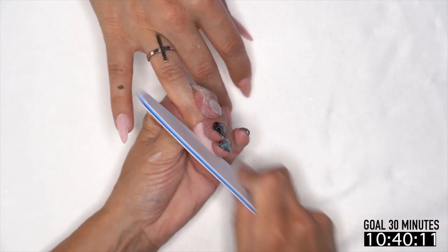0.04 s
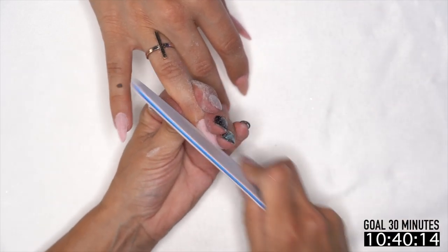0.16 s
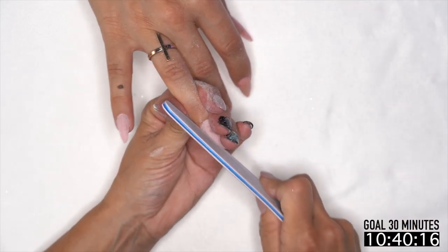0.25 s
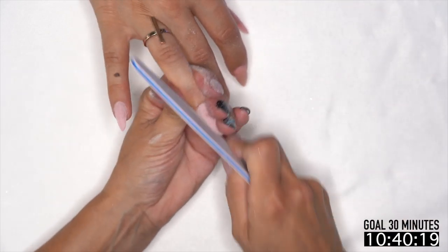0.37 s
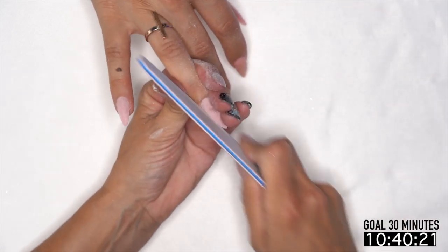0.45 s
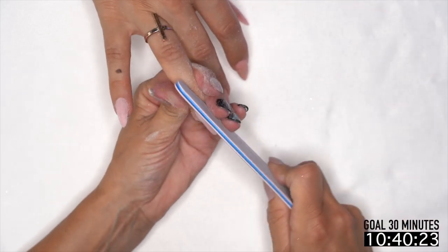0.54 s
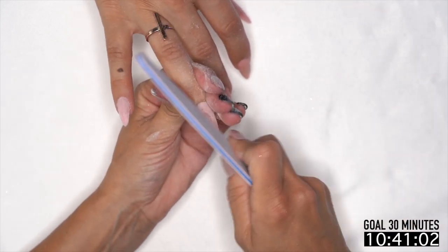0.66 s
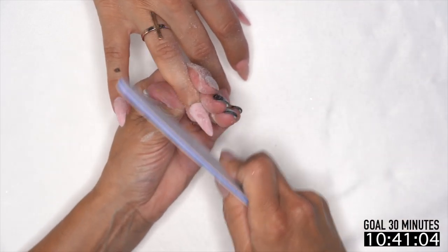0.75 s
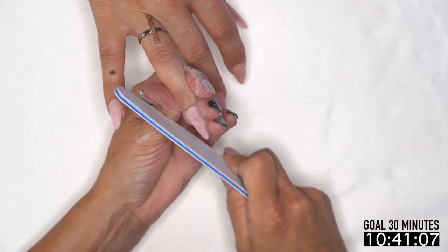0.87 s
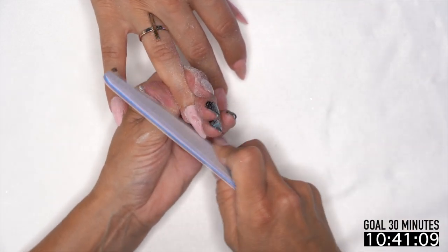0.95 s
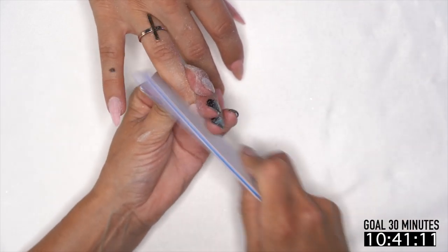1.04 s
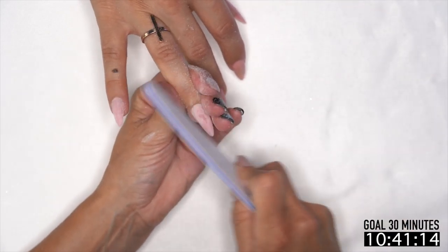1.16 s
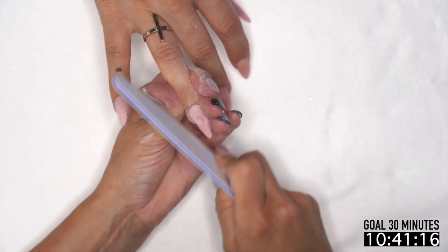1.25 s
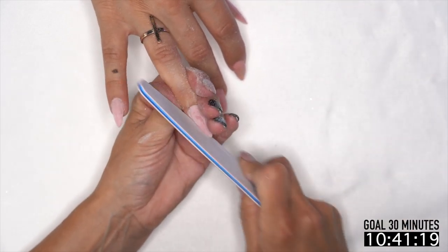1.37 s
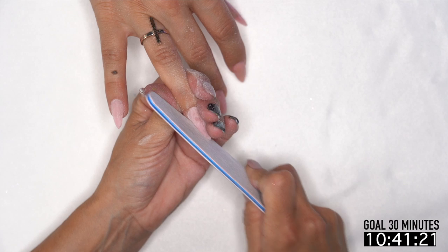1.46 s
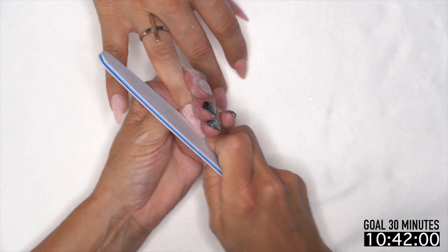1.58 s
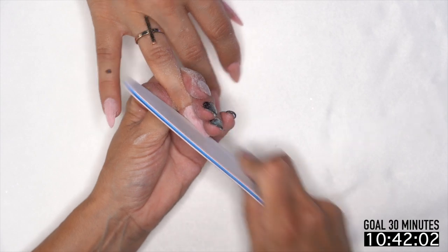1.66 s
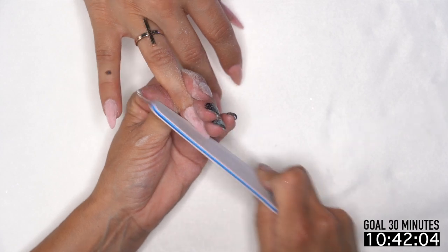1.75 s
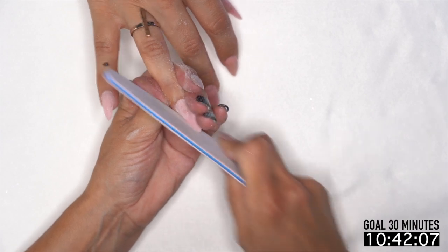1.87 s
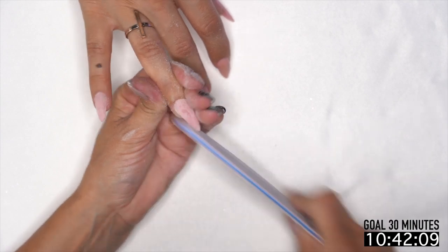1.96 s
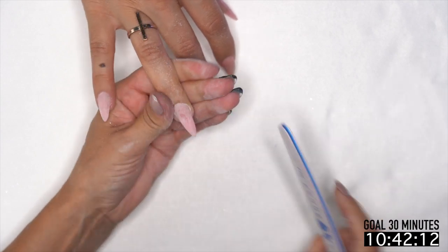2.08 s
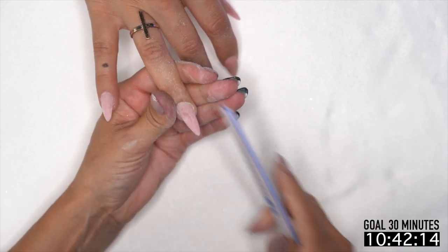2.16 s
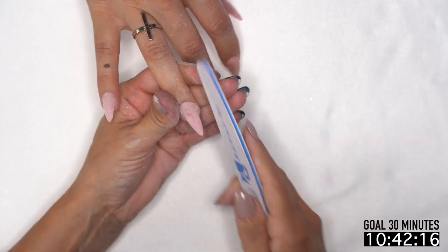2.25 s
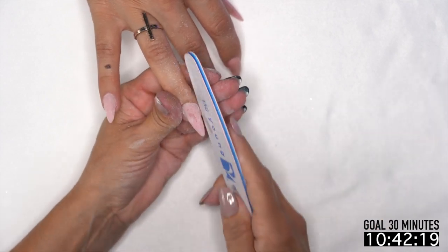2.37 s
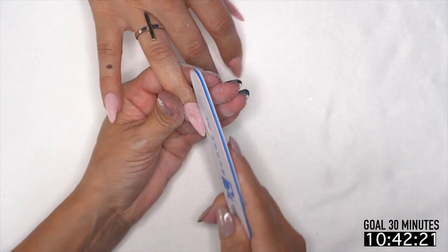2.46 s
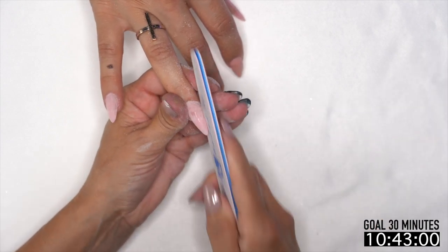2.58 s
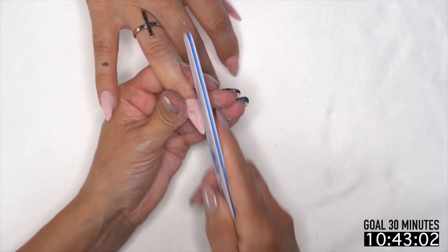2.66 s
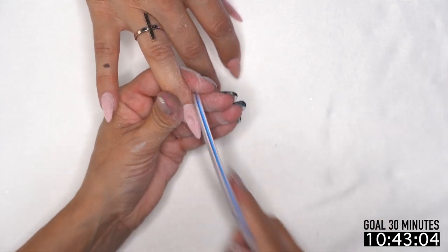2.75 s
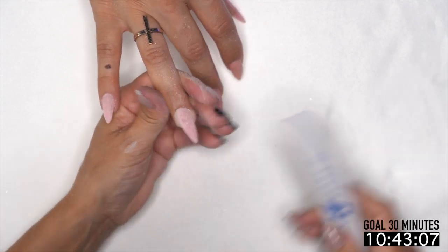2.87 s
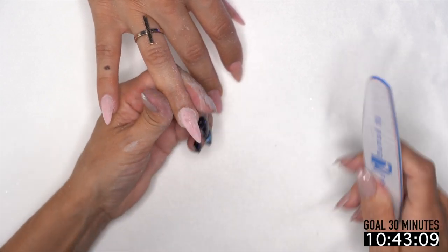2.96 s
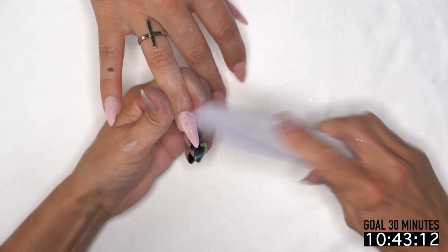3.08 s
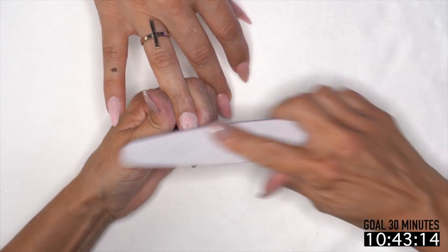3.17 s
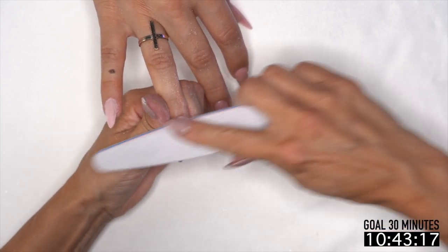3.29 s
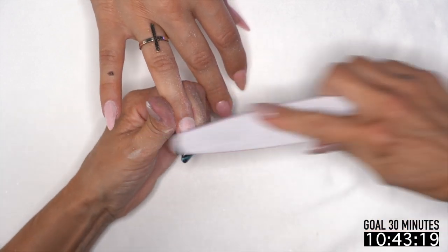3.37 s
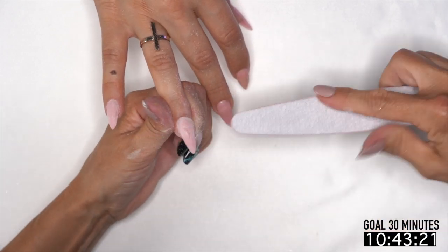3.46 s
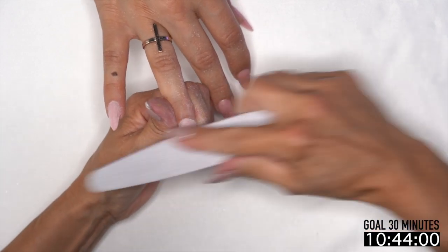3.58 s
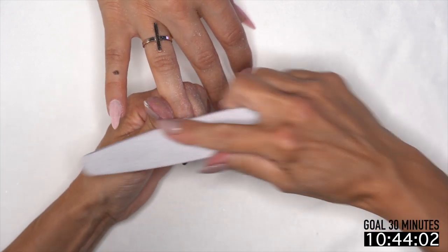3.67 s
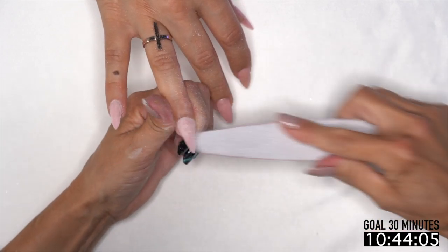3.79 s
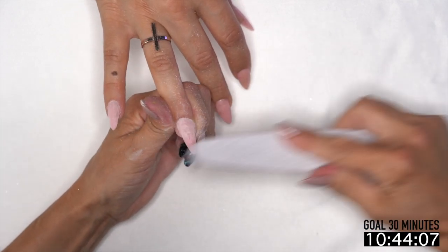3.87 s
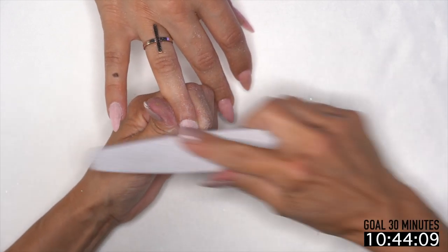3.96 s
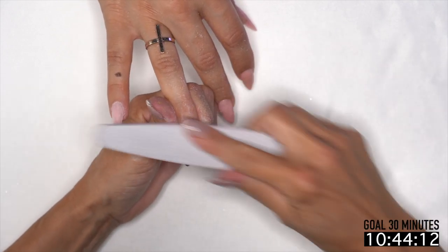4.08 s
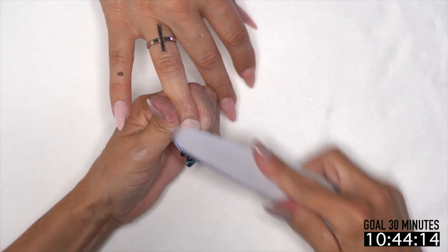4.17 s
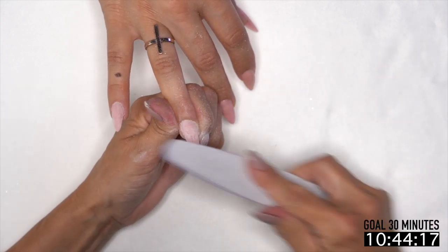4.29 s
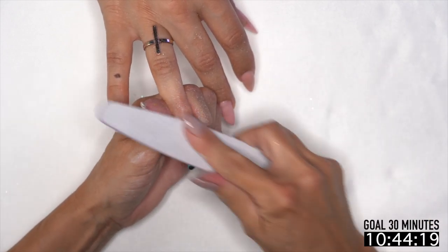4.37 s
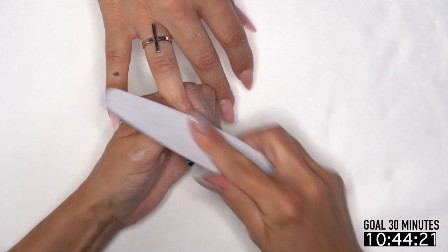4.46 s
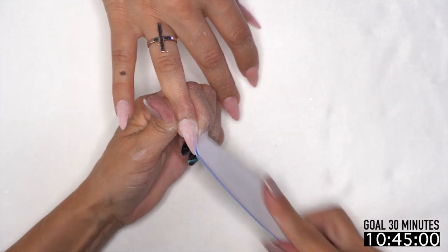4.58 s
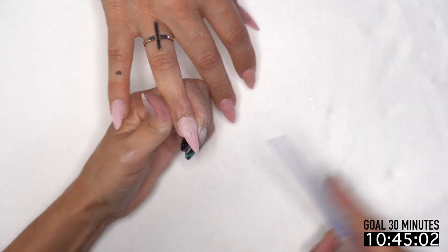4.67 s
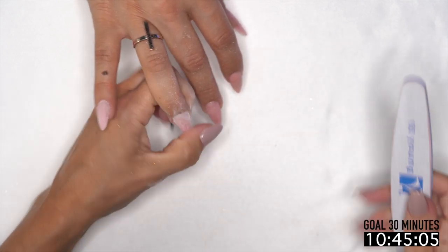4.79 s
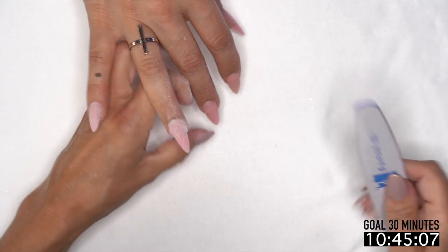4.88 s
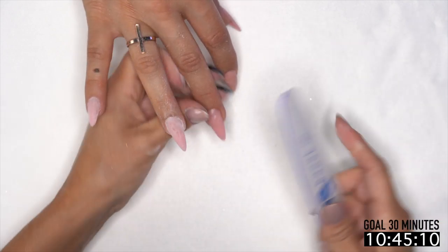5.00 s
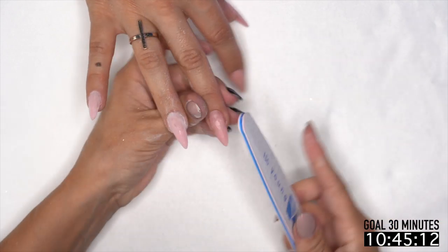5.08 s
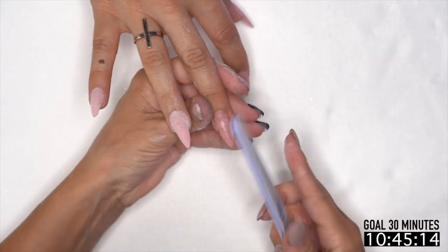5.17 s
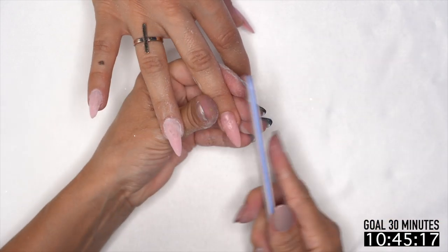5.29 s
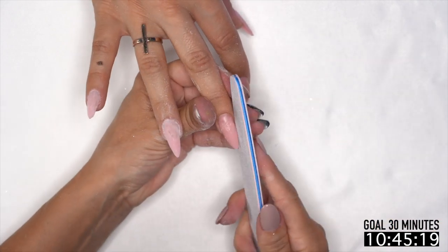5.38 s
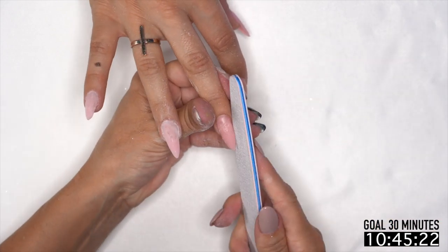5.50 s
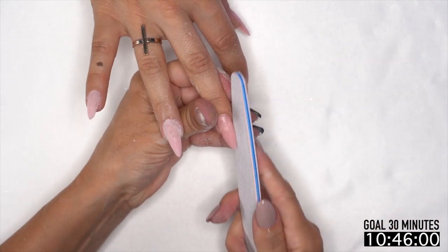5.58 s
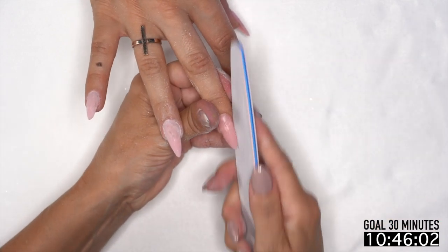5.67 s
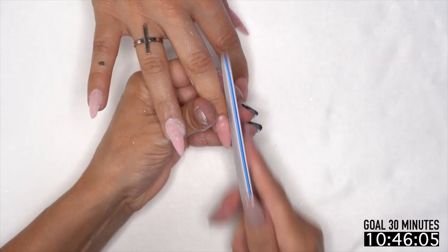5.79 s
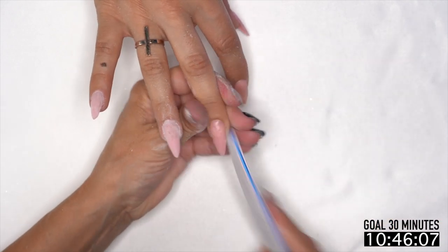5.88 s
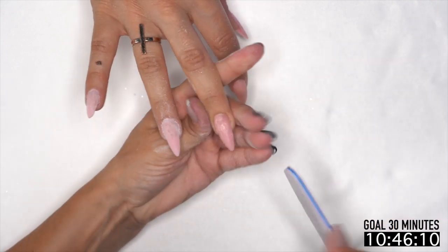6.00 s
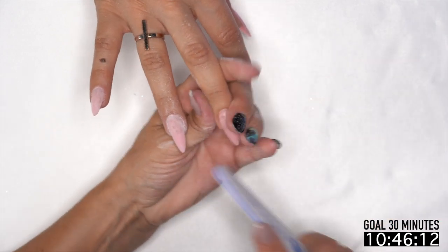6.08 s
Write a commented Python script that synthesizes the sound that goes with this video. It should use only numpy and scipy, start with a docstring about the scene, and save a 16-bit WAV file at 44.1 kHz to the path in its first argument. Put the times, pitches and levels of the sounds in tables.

```python
"""In a small salon, close by, an emery board files a gel nail in quick back-and-forth strokes.
Friction is the source: grit catches on the gel, and its impacts excite the modes of board and nail.
Each of three grips has its own resonances; pushes are full and pulls mostly lighter.
The board's bending note glides, it squeaks, snags and taps, and fingers slide and bump.
Mains hum and ventilation lie under it all."""
import sys
import numpy as np
from scipy import signal
from scipy.fft import rfft, irfft
from scipy.io import wavfile
from scipy.ndimage import uniform_filter1d, map_coordinates

SR = 44100
rng = np.random.default_rng(int(sys.argv[2]) if len(sys.argv) > 2 else 0)


def store_pcm(level_fs):
    """Save levels as 16-bit WAV."""
    pcm = np.round(np.clip(level_fs, -1, 1) * 32767).astype(np.int16)
    wavfile.write(sys.argv[1], SR, np.atleast_2d(pcm).T)


N = 270641
TIME = np.arange(N) / SR
FFT_SIZE = 4096
FREQ = np.maximum(np.arange(FFT_SIZE // 2 + 1) * SR / FFT_SIZE, 1)

# Hum of mains and fans. Each row: frequency in Hz, level before the swell in dB, waver in dB.
HUM_LINES = [(31.4, -62.5, 2), (60.2, -51, 2.5), (86.2, -44, 1.5), (118.8, -41.5, 0.55), (144.7, -52, 5),
             (256.6, -60.5, 3.5), (383.3, -59.5, 2)]
# Ventilation noise. Each row: frequency in Hz, relative spectral density in dB.
AIR_SPECTRUM = [(20, -7), (32, -4), (60, -4.5), (120, -11.5), (177, -12.5), (310, -14.5), (375, -18.5),
                (420, -28), (620, -22.5), (700, -31), (900, -38), (1600, -42), (8900, -51), (16000, -56)]
# Rumble and hum grow louder, then hold. Each row: time in seconds, gain in dB.
AIR_SWELL = [(0, -4.5), (3.8, 1.5), (6.14, 1.5)]
# Fingers slide as the grip changes. Each row: start in seconds, end in seconds, level in dB.
FINGER_SLIDES = [(0.973, 1.064, -52), (2.924, 3.038, -53), (3.034, 3.077, -44.5), (3.113, 3.154, -45.5),
                 (4.721, 5.002, -48), (4.899, 4.935, -42.5), (4.993, 5.185, -45.5), (5.022, 5.047, -38),
                 (5.078, 5.112, -38.5), (5.207, 5.242, -42.5), (5.269, 5.33, -48)]
# Fingers and board bump the hand. Each row: time in seconds, level in dB, ratio to the hand's pitch.
HAND_BUMPS = [(0.07, -41, 1.5), (1.712, -37, 1.13), (2.02, -35, 1.04), (3.08, -33, 1.06), (3.107, -31, 1),
              (3.211, -35.5, 0.89), (3.405, -27, 1), (3.44, -29.5, 0.85), (3.82, -28.5, 0.85),
              (3.885, -30, 0.84), (4.695, -36.5, 1.33), (4.871, -42, 1), (5.768, -32, 2.17)]
# Five sets of resonances. Each row: centre in Hz, width in Hz, relative gain in dB.
SKIN_MODES = [(1480, 1500, -3.5), (2810, 1270, 1), (5100, 2400, 0), (6800, 930, -2), (12200, 18000, -9)]  # sliding skin
HAND_MODES = [(215, 230, 0.5), (291, 160, -0.5), (1060, 630, -9), (1950, 480, -17.5)]  # the bumped hand
EDGE_MODES = [(158, 200, -3.5), (910, 750, -2), (2055, 940, 0.5), (3180, 1350, -1), (4370.0, 350, -0.5),
              (5170, 1260, 1.5), (6670, 2130, -2.2), (8200, 700, -10.5), (9700, 1800, -10.5),
              (11300, 6000, -8.5), (13900, 2060.0, -18), (15410.0, 1720.0, -18)]  # board and nail, the board on edge along the nail's side
TIP_MODES = [(188, 88, -14), (900, 1900, 2), (1700, 850, -19), (3170, 1040, 1), (3770, 250, -4.5),
             (4990, 1400, 4.5), (6870, 1650, 3.5), (8200, 490, -6), (9760, 3000, -4.5), (12100, 3800, -1.5),
             (14600, 2200, -4.5), (15600, 960, -11)]  # the board pointing along the finger
FACE_MODES = [(210, 175, 1), (934, 1300, -2.5), (1580, 510, -10.5), (3000, 1600, -1.5), (4360, 520, -1),
              (5020, 1330, 1), (6630, 2040, -2), (8300, 400, -11), (10100, 2500, -3.5), (11800, 1800, -3.5),
              (13200, 3600, -6), (15000, 1600, -7.5)]  # the board flat across the nail
# Snags and taps. Each row: time in seconds, level in dB, decay in seconds, centre in Hz, width in Hz.
RIM_TAPS = [(0.622, -14.5, 0.0043, 6550, 4220), (1.066, -30, 0.0027, 3000, 6000),
            (1.1359, -16.5, 0.0049, 6100, 5100), (1.229, -40.5, .005, 12000, 5000),
            (1.3595, -20.5, 0.0015, 5530, 1280), (1.401, -39, 0.0028, 3000, 6000),
            (1.612, -21, 0.0092, 2720, 2440), (2.618, -34, .005, 5000, 5000),
            (3.280, -21, 0.0036, 3450, 4000), (3.384, -21, 0.0091, 4600, 2500),
            (3.496, -21.5, .004, 6100, 8000), (4.136, -36, .004, 3500, 6000),
            (5.238, -39.5, 0.012, 1900, 1400), (5.983, -21.5, 0.0038, 11700, 6000)]
# Squeaks of the board. Each row: start in seconds, length in seconds, middle pitch in Hz, level in dB.
BOARD_SQUEAKS = [(1.844, 0.046, 1800, -32), (3.208, 0.03, 3620, -35.5), (3.266, 0.027, 2450, -30),
                 (3.37, 0.096, 4770, -28), (3.406, 0.042, 2600, -25), (5.745, 0.067, 2550, -37),
                 (5.75, 0.056, 900, -36)]
# How the hand moves. Each row: grip, direction, shares of the stroke spent speeding up and slowing
# down, body gain in dB, bending note in dB relative to the rasp, its glide in octaves per second.
HAND_MOTIONS = [("edge", "push", 0.6, 0.32, -0.8, -17, 0.59),
                ("edge", "pull", 0.54, 0.47, -7.5, -27.5, 0.93),
                ("tip", "push", 0.96, 0.38, -1.2, -20, 3.7), ("tip", "pull", 0.39, 0.55, -8, -25, 5.1),
                ("face", "push", 0.13, 0.78, -0.99, -14.5, 4.6),
                ("face", "pull", 0.44, 0.54, -1.2, -10.5, 5.3)]
# Passes of the board. Each row: start in seconds, end in seconds, rasp level in dB,
# fizz gain in dB relative to the rasp, grip, direction.
BOARD_STROKES = [(-0.05, 0.069, -30, 7, "edge", "pull"), (0.082, 0.199, -28, 6.5, "edge", "push"),
                 (0.213, 0.335, -30.5, 8.5, "edge", "pull"), (0.38, 0.499, -31.5, 8, "edge", "push"),
                 (0.51, 0.642, -32.5, 8, "edge", "pull"), (0.666, 0.747, -45, 9, "edge", "push"),
                 (1.079, 1.188, -36, 3.5, "edge", "pull"), (1.405, 1.543, -32.5, 2.5, "edge", "pull"),
                 (1.552, 1.674, -29.5, 4.5, "edge", "push"), (1.691, 1.833, -27, 9.5, "edge", "pull"),
                 (1.834, 1.951, -26, 3.5, "edge", "push"), (1.953, 2.095, -24, 4.5, "edge", "pull"),
                 (2.519, 2.601, -43.5, -1.5, "tip", "pull"), (2.602, 2.738, -28, 0.5, "tip", "push"),
                 (2.75, 2.910, -27.5, 7.5, "tip", "pull"), (3.212, 3.248, -35, -10, "face", "push"),
                 (3.259, 3.366, -28.5, -3.5, "face", "push"), (3.363, 3.523, -24, 3.5, "face", "pull"),
                 (3.652, 3.743, -26.5, 1, "face", "push"), (3.739, 3.921, -27, 4.5, "face", "pull"),
                 (4.036, 4.133, -26.5, 2, "face", "push"), (4.125, 4.332, -28.5, 6, "face", "pull"),
                 (4.432, 4.513, -29, 3, "face", "push"), (4.529, 4.734, -29.5, 7, "face", "pull"),
                 (5.675, 5.82, -28, 1.5, "tip", "push"), (5.825, 6.022, -28, 3.5, "tip", "pull"),
                 (6.045, 6.124, -37, -2.5, "tip", "push")]


def undb(db):
    """Amplitude grows tenfold for every 20 dB."""
    return 10 ** (np.asarray(db) / 20)


def unit(x):
    """Normalisation brings the rms to 1."""
    return x / np.sqrt(np.mean(x ** 2))


def clock(length):
    """Uniform sampling gives the times within an event, in seconds."""
    return np.arange(max(int(length * SR), 64)) / SR


def add(out, start, x):
    """Sounds superpose: x joins out from the start time in seconds."""
    i = int(start * SR)
    x, i = x[max(-i, 0):], max(i, 0)
    out[i:i + len(x)] += x[:max(len(out) - i, 0)]


def walk(rate_hz, size):
    """A moving average turns random steps into smooth motion with spread near 1."""
    hold = max(int(SR / rate_hz), 1)
    steps = np.repeat(rng.standard_normal(size // hold + 1), hold)
    return 0.96 * uniform_filter1d(steps, hold)[:size]


def arch(size):
    """Contact pressure swells and lets go."""
    return np.sqrt(np.sin(np.pi * np.arange(size) / size))


def grit(size, spread_db):
    """Friction is a dense train of impacts: most tiny, a few large."""
    return unit(rng.standard_normal(size) * undb(spread_db * rng.standard_normal(size)))


def resonances(modes):
    """Steep-sided resonances add in power to give one gain over FREQ."""
    peaks = (undb(db) / (1 + ((FREQ ** 2 - hz ** 2) / (FREQ * width)) ** 2) for hz, width, db in modes)
    return np.sqrt(sum(peak ** 2 for peak in peaks))


def ring(x, gain):
    """A resonator is causal: x passes through the minimum-phase response with this gain."""
    cepstrum = irfft(np.log(gain + gain.max() / 10 ** 4))
    cepstrum[1:FFT_SIZE // 2] *= 2
    cepstrum[FFT_SIZE // 2 + 1:] = 0
    return signal.fftconvolve(x, irfft(np.exp(rfft(cepstrum))))


def salon(rumble_db=-39, hiss_db=-52, phase_wander=0.34, hiss_swell=0.59):
    """Wavering tones of mains and fans swell together with the broadband noise of ventilation."""
    flow = undb(np.interp(TIME, *np.transpose(AIR_SWELL)))
    hum = np.zeros(N)
    for hz, db, waver in HUM_LINES:
        amplitude = np.sqrt(2) * undb(db + waver * walk(5, N))
        hum += amplitude * np.sin(2 * np.pi * hz * TIME + phase_wander * waver * walk(4, N))
    hz, db = np.transpose(AIR_SPECTRUM)
    gain = undb(np.interp(np.log(FREQ), np.log(hz), db))
    treble = 1 / (1 + (1000 / FREQ) ** 4)
    rumble = unit(ring(rng.standard_normal(N), gain * np.sqrt(1 - treble))[:N])
    hiss = unit(ring(rng.standard_normal(N), gain * np.sqrt(treble))[:N])
    return flow * (hum + undb(rumble_db) * rumble) + flow ** hiss_swell * undb(hiss_db) * hiss


def room(x, level_db=-15, low_t60_s=0.55, bright_t60_s=0.37, bright_db=-3, build_s=0.002):
    """Diffuse reverberation decays exponentially, the treble first."""
    t = clock(1)
    low = signal.sosfilt(signal.butter(2, 5500, fs=SR, output="sos"), rng.standard_normal(SR))
    bright = undb(bright_db) * rng.standard_normal(SR)
    tail = low * undb(-60 * t / low_t60_s) + bright * undb(-60 * t / bright_t60_s)
    tail *= np.clip(t / build_s, 0, 1)
    return undb(level_db) * signal.fftconvolve(x, tail / np.sqrt(np.sum(tail ** 2)))[:N]


def fingers():
    """Stick-slip friction of skin on skin makes a soft rustle."""
    out = np.zeros(N)
    for start, end, db in FINGER_SLIDES:
        pressure = arch(len(clock(end - start)))
        slips = grit(len(pressure), spread_db=7.5)
        add(out, start, undb(db) * ring(slips * pressure, unit(resonances(SKIN_MODES))))
    return out


def burst(contact_s, decay_s, gain):
    """A rush of impacts drives a resonator, holding through the contact and then decaying."""
    t = clock(1 / 8)
    envelope = np.exp(-np.maximum(t - contact_s, 0) / decay_s)
    return ring(rng.standard_normal(len(t)) * envelope, unit(gain))


def bumps(contact_s=0.0074, decay_s=0.015):
    """Knocks excite the hand's damped modes, which lie higher where the spot is firmer."""
    out = np.zeros(N)
    for start, db, pitch in HAND_BUMPS:
        modes = [(hz * pitch, width, mode_db) for hz, width, mode_db in HAND_MODES]
        add(out, start, undb(db) * burst(contact_s, decay_s, resonances(modes)))
    return out


def tap(decay_s, hz, width_hz, board_db=-10, contact_share=0.39):
    """An impact excites the spot that is hit and, more faintly, the modes of the whole board."""
    gain = resonances([(hz, width_hz, 0)]) + undb(board_db) * resonances(EDGE_MODES)
    return burst(contact_share * decay_s, decay_s, gain)


def taps():
    """Brief contacts make broadband clicks as the board snags or knocks on the nail's rim."""
    out = np.zeros(N)
    for start, db, decay_s, hz, width_hz in RIM_TAPS:
        add(out, start, undb(db) * tap(decay_s, hz, width_hz))
    return out


def gliding_mode(x, hz, width_hz):
    """A resonance with a moving centre carries a decaying envelope on its turning phase."""
    turn = np.exp(2j * np.pi * np.cumsum(hz) / SR)
    pole = np.exp(-np.pi * width_hz / SR)
    return np.real(turn * signal.lfilter([1 - pole], [1, -pole], x / turn))


def pressed_mode(hz, width_hz):
    """Forced vibration: grit drives one gliding mode while the pressure swells and lets go."""
    note = gliding_mode(grit(len(hz), spread_db=6.0), hz, width_hz)
    note = gliding_mode(note, hz, width_hz)  # a second pass steepens the sides
    return unit(note) * arch(len(hz))


def squeaks(octaves_per_s=2.8, width_hz=620):
    """Grit bites into a single mode of the board, whose narrow band is heard as a rough, rising squeak."""
    out = np.zeros(N)
    for start, length, hz, db in BOARD_SQUEAKS:
        rising_hz = hz * 2 ** (octaves_per_s * (clock(length) - length / 2))
        add(out, start, undb(db) * pressed_mode(rising_hz, width_hz))
    return out


def bending(length, glide, direction, full_reach_hz=804, width_hz=335):
    """A longer beam vibrates lower: a push lengthens the board's free end and a pull shortens it."""
    t = clock(length)
    from_full_reach = length - t if direction == "push" else t
    return pressed_mode(full_reach_hz * 2 ** (glide * from_full_reach), width_hz) * arch(len(t))


def table_echo(x, direction, lag_s=0.0016, travel=0.19, reflection=0.21):
    """The table's reflection interferes with the rasp; as the board moves, a hollow comb sweeps."""
    i = np.arange(len(x))
    sweep = (1 if direction == "pull" else -1) * np.tanh((i / SR - 0.06) / 0.11)
    lag = SR * lag_s * rng.uniform(0.844, 1.15) * (1 + travel * sweep)
    echo = map_coordinates(x, [i - lag], order=3)
    return (x - reflection * echo) / np.sqrt(1 + reflection ** 2)


def contact_spot(modes, detune=0.015, vary_db=1.9):
    """The response depends on the point of contact, so each pass shifts the resonances a little."""
    chance = rng.standard_normal((len(modes), 2))
    gain = resonances([(hz * (1 + detune * shift), width, db + vary_db * lift)
                       for (hz, width, db), (shift, lift) in zip(modes, chance)])
    return gain / np.sqrt(np.mean(gain ** 2 * (FREQ > 2000) * (FREQ < 7500)))


def grind(fizz_db, neutral_db=5, db_per_db=0.43, hz=2450, half_width_hz=1020):
    """Grit that digs in instead of skating trades fizz for midrange; the result is in dB over FREQ."""
    peak_db = np.clip(db_per_db * (neutral_db - fizz_db), -1, 1)
    return peak_db / (1 + ((FREQ - hz) / half_width_hz) ** 4)


def stroke(length, rise, fall, body_db, fizz_db, modes, stick_speed=0.17):
    """Abrasion noise grows with sliding speed: the board speeds up, chatters and slows to turn round."""
    t = clock(length)
    speeding = np.sin(np.pi / 2 * np.clip(t / (rise * length), 0, 1))
    slowing = np.sin(np.pi / 2 * np.clip((length - t) / (fall * length), 0, 1))
    speed = speeding * slowing
    speed /= 1 + (stick_speed / (speed + 1e-6)) ** 4  # too slow, and the board sticks
    # the pressure eases slightly in mid-stroke and is never quite even
    pressure_db = -1.5 * (np.sin(np.pi * t / length) - 0.8) + 0.85 * walk(69.7, len(t))
    chatter = undb(pressure_db + 1.27 * walk(420, len(t)))
    gain = contact_spot(modes)
    body_band = 1 / (1 + (FREQ / 1700) ** 6)
    fizz_band = 1 / (1 + (8000 / FREQ) ** 8)
    rasp_gain = gain * undb(body_db * body_band + grind(fizz_db)) * np.sqrt(1 - fizz_band)
    rasp = ring(grit(len(t), spread_db=5.0) * chatter * speed ** 0.87, rasp_gain)
    # the finest fizz needs speed, so it comes later and leaves sooner than the rasp
    fizz = ring(grit(len(t), spread_db=6.0) * chatter * speed ** 1.58, gain * np.sqrt(fizz_band))
    return rasp + undb(fizz_db) * fizz


def filing(landing_lag_s=0.0023, landing_db=-1):
    """Source and filter: grip and direction shape each stroke's friction, and the grip sets its modes."""
    out = np.zeros(N)
    motions = {(grip, direction): motion for grip, direction, *motion in HAND_MOTIONS}
    modes = {"edge": EDGE_MODES, "tip": TIP_MODES, "face": FACE_MODES}
    for start, end, rasp_db, fizz_db, grip, direction in BOARD_STROKES:
        rise, fall, body_db, note_db, glide = motions[grip, direction]
        length = end - start
        rasp = undb(rasp_db) * stroke(length, rise, fall, body_db, fizz_db, modes[grip])
        add(out, start, table_echo(rasp, direction))
        add(out, start, undb(rasp_db + note_db) * bending(length, glide, direction))
        if (grip, direction) == ("face", "push"):  # a flat push is set down with a tap
            landing = tap(decay_s=0.0037, hz=6400, width_hz=19000)
            add(out, start + landing_lag_s, undb(rasp_db + landing_db) * landing)
    return out


def scene():
    """The direct sound of the work, its reverberation and the salon's background superpose."""
    work = filing() + squeaks() + fingers() + taps() + bumps()
    return (work + room(work) + salon())[None]


def record(dry, top_hz=15800):
    """A steep low-pass filter limits the bandwidth."""
    return signal.sosfilt(signal.ellip(10, 0.1, 80, top_hz, fs=SR, output="sos"), dry)


dry = scene()
out = record(dry)
store_pcm(out)
```